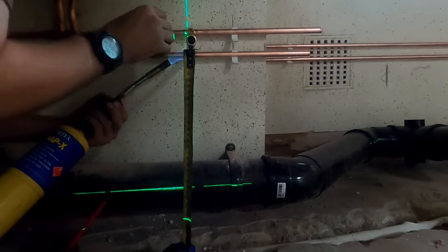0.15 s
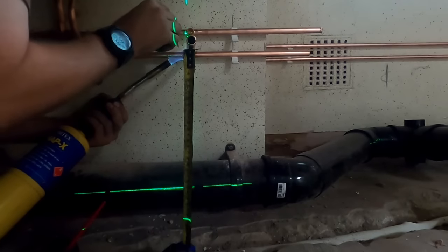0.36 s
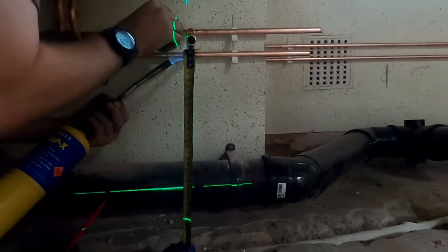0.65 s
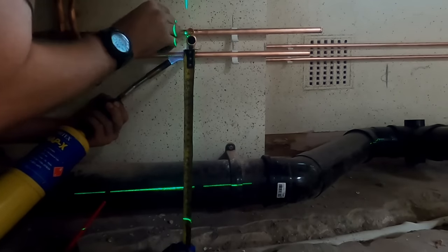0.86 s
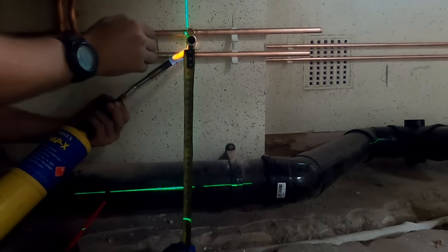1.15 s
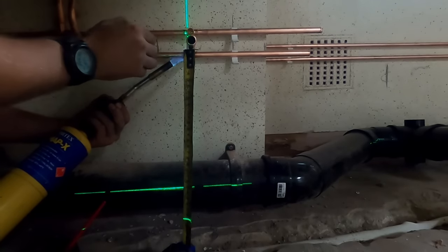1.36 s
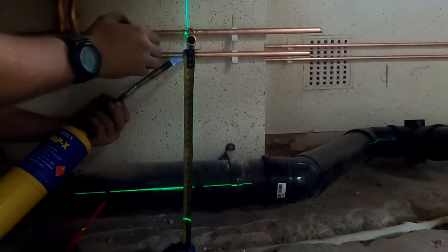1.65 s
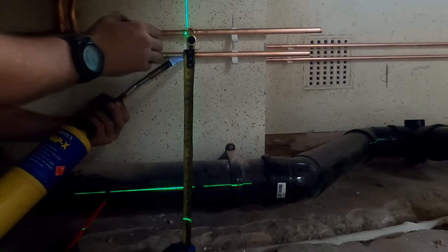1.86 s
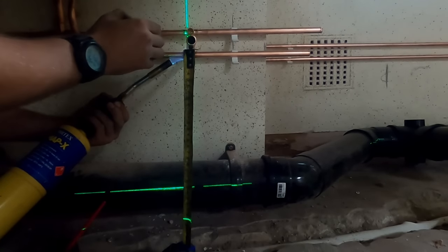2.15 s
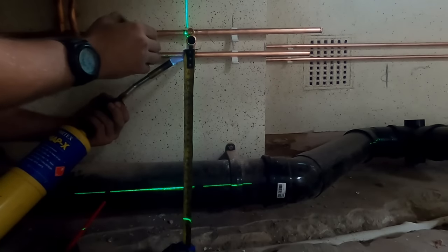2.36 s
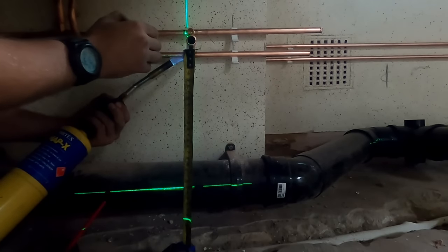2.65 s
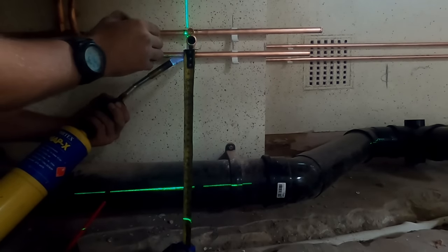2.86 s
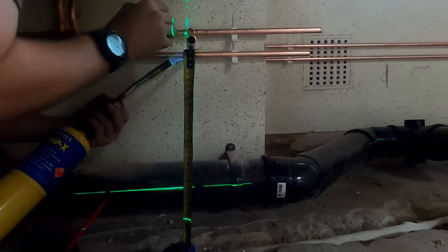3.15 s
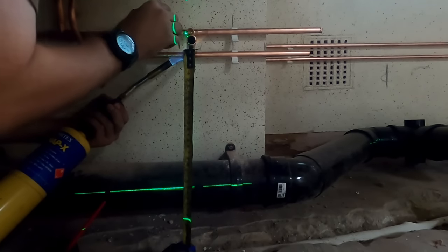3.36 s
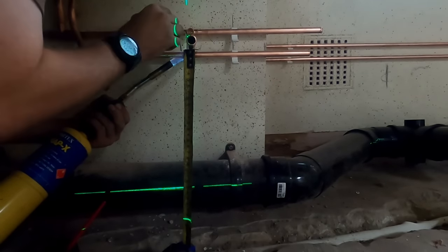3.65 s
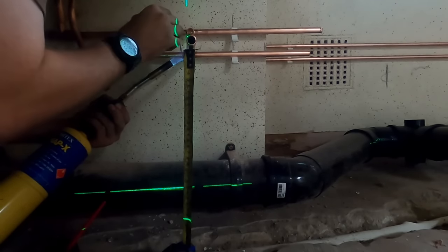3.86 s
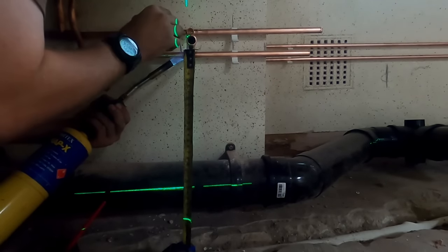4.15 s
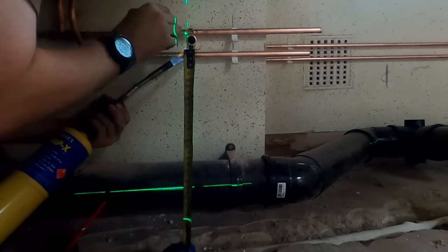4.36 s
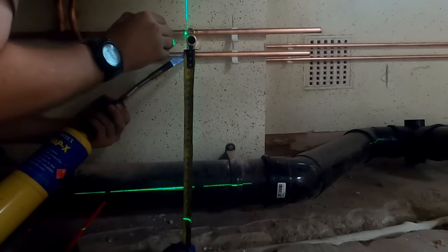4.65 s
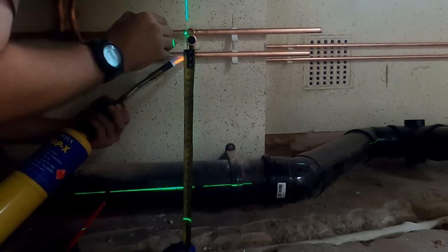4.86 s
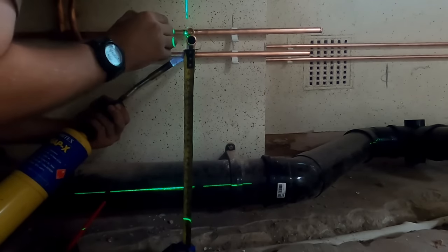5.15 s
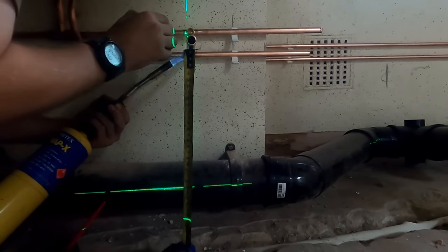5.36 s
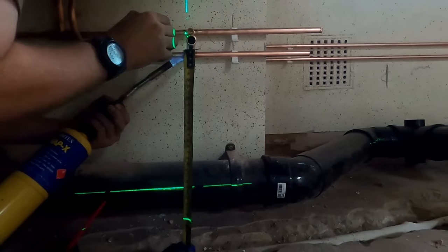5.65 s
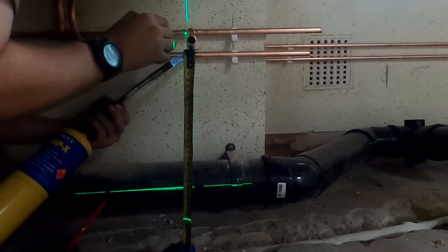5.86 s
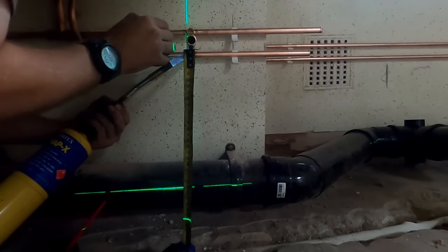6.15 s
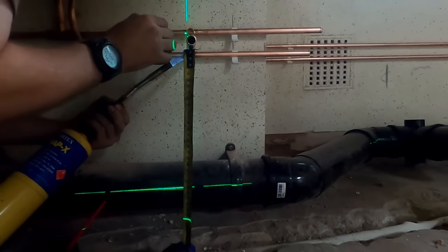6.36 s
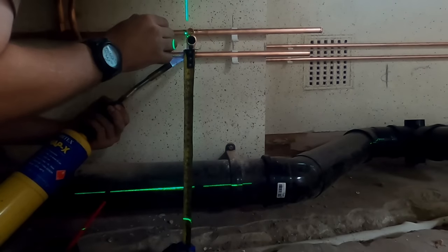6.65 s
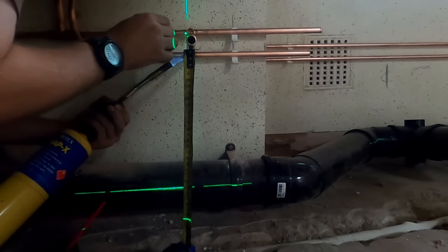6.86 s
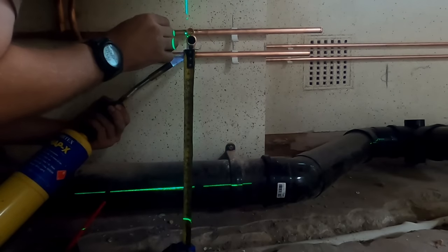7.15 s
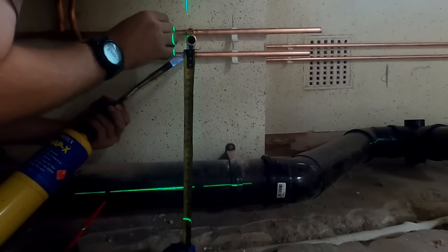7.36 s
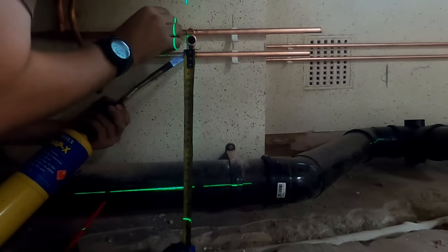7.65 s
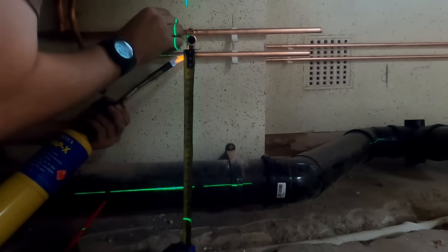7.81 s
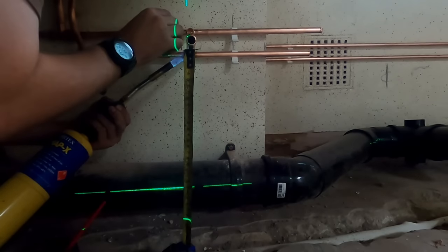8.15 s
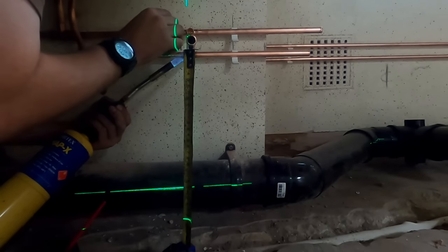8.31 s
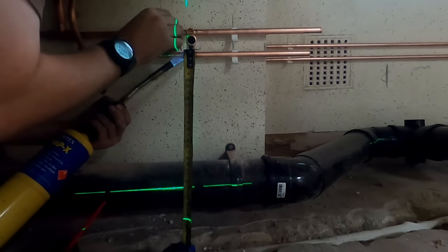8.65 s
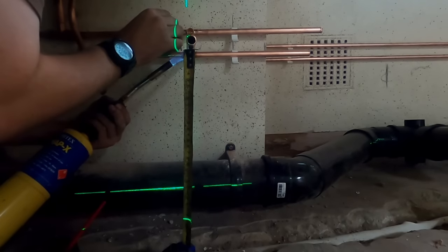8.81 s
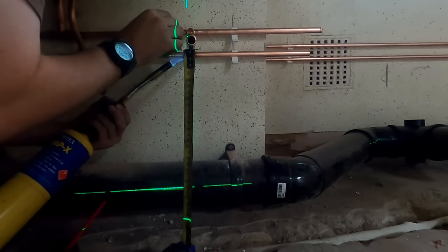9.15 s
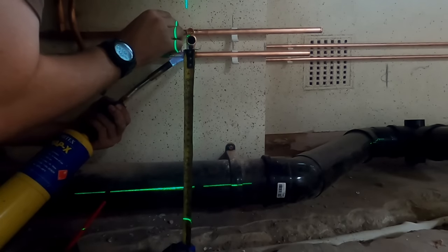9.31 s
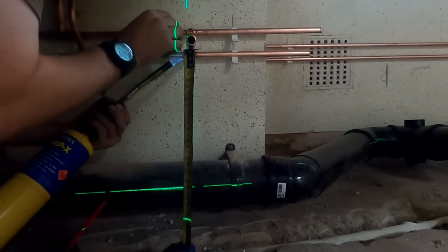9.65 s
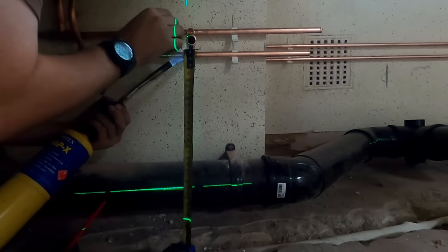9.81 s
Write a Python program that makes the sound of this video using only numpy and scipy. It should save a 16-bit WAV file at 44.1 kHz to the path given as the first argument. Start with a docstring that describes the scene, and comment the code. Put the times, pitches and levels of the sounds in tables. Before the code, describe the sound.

Close stereo sound of a gas blowtorch burning without a break in a small hard-walled room. A low, booming roar sits under a hollow ringing and a bright hiss. The flame flutters raggedly on a copper fitting and sputters in brief puffs. Flux spits sparsely at first, crackles densely in the middle, then thins out while the torch keeps burning.

```python
"""A roaring, hissing gas blowtorch heats a copper fitting in a small room, heard in stereo.
The flame is coloured noise that rumbles, booms and roars in the room's low modes, with dull thumps.
Narrow resonances in noise ring as the burner tube and its mouth; bright noise is the hiss of the jet.
Where the flame strikes the fitting it flutters in ragged noise, and later sputters in short puffs.
The hot flux sizzles and spits in decaying noise bursts, and twice squeaks in a tiny gliding tone."""
import sys
import numpy as np
from scipy import signal
from scipy.fft import rfft, irfft, next_fast_len
from scipy.io import wavfile
from scipy.ndimage import uniform_filter1d, map_coordinates

SR = 44100
rng = np.random.default_rng(int(sys.argv[2]) if len(sys.argv) > 2 else 0)


def to_wav(s):
    """Save 16-bit WAV."""
    ch = np.atleast_2d(s).T  # columns
    pcm = np.round(np.clip(ch, -1, 1) * 32767)  # PCM
    wavfile.write(sys.argv[1], SR, pcm.astype(np.int16))


N = 440118

# How hard the flux boils. Each row: time in seconds, spits per second, typical spit size in dB.
BOIL = [(0, 6, -58), (1.5, 12, -46), (4.1, 27, -50), (4.8, 44, -55), (6.5, 51, -48.5), (7.9, 27, -48),
        (8.5, 33, -65), (9.98, 8.7, -52)]
# A spectrum far below any resonance, so that only the resonances sound: (Hz, dB per Hz).
DARK = [(1000, -90)]
LOW_EVEN_S = 0.43  # the lowest noise holds its strength over this time
WANDER_RATE = 5  # knots per second in the unsteady gas flow


def amp(db):
    """Decibels to gain."""
    return 10 ** (np.asarray(db) / 20)


def unit(x):
    """Scale to rms 1."""
    return x / np.sqrt(np.mean(x ** 2) + 1e-20)


def along(points, hz):
    """Read (Hz, value) points on a log frequency axis."""
    f, v = np.transpose(points)
    return np.interp(np.log(hz + 1), np.log(f + 1), v)


def curves(rows):
    """One value per sample for each column after the time."""
    s, *cols = np.transpose(rows)
    return [np.interp(np.arange(N) / SR, s, c) for c in cols]


def wobble(rate):
    """A smooth random curve of rms 1 with rate knots a second."""
    knots = rng.standard_normal(8192)
    return unit(map_coordinates(knots, [np.arange(N) * rate / SR], mode="wrap"))


def swell(s, length):
    """A smooth rise and fall around time s."""
    return np.exp(-(2 * (np.arange(N) / SR - s) / length) ** 2)


def filtered(x, response):
    """Shape x by a response that is a function of frequency."""
    m = next_fast_len(N + 8192)
    return irfft(rfft(x, m) * response(np.fft.rfftfreq(m, 1 / SR)), m)[..., :N]


def add(track, s, sound):
    """Mix a sound into a track at time s."""
    part = track[round(s * SR):][:len(sound)]
    part += sound[:len(part)]


def rush(spectrum, modes=()):
    """Turbulence of rms 1, coloured by a spectrum and resonances, as the two microphones hear it."""
    # How alike the two microphones are. Each row: frequency in Hz, likeness from 0 to 1.
    alike = [(30, .9), (100, .985), (450, 0.97), (680, 0.7), (1050, 0.98), (1900, 0.59), (2400, 1),
             (3000, 0.78), (4200, 0.93), (4900, 0.99), (6000, 0.45), (7000, 0.87), (8000, 0.36),
             (14000, 0.31)]
    # Stereo balance. Each row: frequency in Hz, left minus right in dB.
    balance = [(120, 0.7), (200, .1), (450, 0), (800, -3), (1050, -3.3), (1400, 0), (2300, 0), (2700, 2),
               (3100, 1.5), (3750, 0.5), (4450, -5.5), (4900, -2.5), (5750, -5), (6400, -9.5), (6900, -2),
               (9000, -5), (13000, -4.8)]
    # Stereo phase. Each row: frequency in Hz, radians by which left leads.
    lead = [(100, -.02), (220, -.1), (420, -.11), (700, -.37), (1100, -.12), (1700, -0.48), (5000, -0.93),
            (6150, -1.27), (6600, -0.58), (7400, -0.96), (9000, -2.04)]
    m = next_fast_len(N + 8192)
    hz = np.fft.rfftfreq(m, 1 / SR)
    power = amp(along(spectrum, hz)) ** 2
    for centre, width, db in modes:
        resonance = amp(db) / (1 + 2 * ((hz - centre) / width) ** 2)
        power = power + resonance ** 2
    # the direct sound is shared; the walls' answer differs from side to side
    shared, apart = rfft(rng.standard_normal((2, m))) * np.sqrt(power)
    turn = np.arccos(np.clip(along(alike, hz), 0, 1)) / 2
    side = np.array([[1], [-1]])  # left, right
    pair = np.cos(turn) * shared + side * np.sin(turn) * apart
    pair = pair * amp(side * along(balance, hz) / 2)
    pair = pair * np.exp(1j * side * along(lead, hz) / 2)
    return unit(irfft(pair, m)[:, :N])


def evened(x, seconds):
    """Noise with its swings slower than the given time taken out."""
    power = uniform_filter1d(np.mean(x ** 2, axis=0), max(int(seconds * SR), 1))
    return unit(x / np.sqrt(np.abs(power) + 1e-9))


def drifting(x, ratio):
    """Shift every resonance of a sound by a moving pitch ratio, reading it faster or slower."""
    position = np.cumsum(ratio)
    return np.array([map_coordinates(channel, [position], mode="mirror") for channel in x])


def burst(t60, attack):
    """The envelope of a pop that dies away between the near walls."""
    t = np.arange(SR // 8) / SR
    return amp(-60 * t / t60) * (1 - np.exp(-t / attack))


def crackle(rate, size_db, t60):
    """The envelope of tiny bubbles bursting at random, rate a second, their powers added."""
    chance, size = rng.random(N), rng.standard_normal(N)
    ticks = (chance < rate / SR) * amp(size_db + 2 * np.clip(size, -1.5, 1.5))
    tick = burst(t60, attack=.0002)
    return np.sqrt(np.abs(signal.fftconvolve(ticks ** 2, tick ** 2)[:N]))


def flame_depths():
    """Unsteady burning drones and rumbles at the bottom and booms in the room's strongest mode."""
    # Levels of the three low layers. Each row: time in seconds, level in dB.
    drone_level = [(0, -65), (1.3, -60), (3.5, -62), (4.2, -64), (4.6, -62), (5.3, -64), (6.4, -61),
                   (6.8, -55), (7.3, -60), (8.1, -63), (8.8, -61), (9.3, -65), (9.98, -63)]
    rumble_level = [(0, -56), (.9, -60), (1.25, -56.5), (1.5, -63), (2.3, -55), (3, -55), (3.75, -56),
                    (4.1, -60), (4.5, -57), (5.7, -56.5), (6.55, -57), (6.8, -49.5), (7.1, -58), (7.7, -59),
                    (8.1, -57), (8.8, -52.5), (9.4, -53), (9.98, -55)]
    boom_level = [(0, -50.5), (.5, -48), (.88, -53), (1.32, -40), (1.48, -51), (1.7, -45), (2.3, -46.5),
                  (2.55, -49), (2.9, -45), (3.1, -51), (3.55, -43.5), (4.55, -48), (4.75, -50),
                  (5.2, -49.5), (5.48, -38.5), (5.68, -46), (5.85, -41), (6.08, -47.5), (6.35, -38.5),
                  (6.55, -52.5), (6.8, -43), (7.1, -49.5), (7.3, -41), (7.5, -42), (7.68, -39.5),
                  (7.95, -50), (8.85, -47.5), (9.4, -44), (9.98, -44.5)]
    # Their smooth spectra. Each row: frequency in Hz, relative dB per Hz.
    drone_spectrum = [(18, -30), (28, -22), (40, -12), (52, -3), (68, -3), (85, -20), (120, -51)]
    rumble_spectrum = [(50, -50), (66, -20), (77, -11), (95, -8), (112, -23), (200, -66)]
    boom_spectrum = [(75, -41), (103, -8), (140, 2.5), (165, -38), (250, -72)]
    # Their resonances. Each row: frequency in Hz, width in Hz, relative dB.
    drone_modes = [(62, 5, 8)]
    rumble_modes = [(90, 21, 0)]
    boom_modes = [(123.1, 14.7, 12)]
    (drone_db,), (rumble_db,), (boom_db,) = curves(drone_level), curves(rumble_level), curves(boom_level)
    uneven_rumble = amp(1.5 * wobble(16)) * rush(rumble_spectrum, rumble_modes)
    rumble = amp(rumble_db) * evened(uneven_rumble, LOW_EVEN_S)
    boom = amp(boom_db) * evened(rush(boom_spectrum, boom_modes), LOW_EVEN_S)
    drone = amp(drone_db + 1.7 * wobble(15)) * evened(rush(drone_spectrum, drone_modes), LOW_EVEN_S)
    return drone + rumble + boom


def roar(eddies):
    """The flame roars in the room's low modes, fills out at the start and now and then surges or sags."""
    # Momentary surges. Each row: time in seconds, length in seconds, change of the roar in dB.
    surges = [(0.02, 0.05, 3.5), (0.32, 0.065, -2), (0.45, 0.055, -3.5), (0.877, 0.05, -2), (1.26, 0.2, 2),
              (1.577, 0.12, 2), (1.707, 0.039, -5), (2.267, 0.08, -4), (2.66, 0.09, -3), (2.78, 0.06, 2.5),
              (3.096, 0.044, -6), (3.418, 0.05, 2.5), (3.88, 0.045, -2.5), (4.126, 0.082, 2.5),
              (4.215, 0.043, -6.5), (4.352, 0.1, 3.5), (4.88, 0.24, -1), (5.408, 0.05, 1),
              (5.77, 0.042, -5), (6.742, 0.044, 5), (7.1, 0.068, -2.5), (7.44, 0.15, -3), (8.32, 0.036, 4),
              (8.46, 0.041, -5), (8.56, 0.06, 2.5), (8.98, 0.24, -1.7), (9.31, 0.035, 2.5), (9.52, 0.2, 1),
              (9.763, 0.08, 2)]
    # The smooth spectrum. Each row: frequency in Hz, relative dB per Hz.
    roar_spectrum = [(110, -39), (150, -6), (200, -5.5), (260, -5.5), (285, -10), (345, -10), (390, -14.5),
                     (470, -21), (590, -23.5), (650, -50), (900, -80)]
    # Modes of the room. Each row: frequency in Hz, width in Hz, relative dB.
    room_modes = [(176.2, 14.2, -0.5), (211.7, 14, -3.5), (268, 10, -8.5), (302.5, 8.4, -0.5),
                  (322.8, 13.3, -2), (428, 19, -13.5), (460.7, 8.9, -15.5)]
    steady_db, softer_db, settle_s, even_s = -42, 1.2, 1, .1
    roar_db = steady_db - softer_db * np.exp(-np.arange(N) / SR / settle_s)
    roar_db = roar_db + sum(db * swell(s, length) for s, length, db in surges)
    shaken = amp(1.07 * eddies + 0.9 * wobble(24)) * rush(roar_spectrum, room_modes)
    return amp(roar_db) * evened(shaken, even_s)


def thumps():
    """A pocket of gas burns at once: a single dull swing of pressure."""
    # Each row: time of the swing's middle in seconds, peak level in dB.
    pockets = [(0.026, -33), (1.289, -30), (1.57, -33), (1.765, -29), (4.017, -27), (4.366, -29),
               (4.435, -33), (4.635, -26.5), (5.341, -30), (5.494, -31), (6.223, -29), (6.34, -31),
               (7.701, -31), (8.547, -29), (8.564, -31), (9.468, -34), (9.493, -28), (9.787, -33)]
    strongest_hz = 206
    out = np.zeros(N)
    t = np.arange(SR // 50) / SR
    u = (np.pi * strongest_hz * (t - t.mean())) ** 2
    for s, db in pockets:
        add(out, s - t.mean(), amp(db) * (2 * u - 1) * np.exp(-u))
    return out


def burner(eddies, flow):
    """The gas keeps the air in the burner tube and at its mouth ringing; the pitch wanders with the flow."""
    # Ring of the tube, then of its mouth. Each row: time in seconds, level in dB.
    tube_ring = [(0, -52.5), (.7, -50.5), (4.2, -51), (5.3, -48.5), (7.6, -50.5), (8.5, -50), (9.98, -49.5)]
    mouth_ring = [(0, -56), (1, -57), (1.45, -61.5), (3, -57.5), (3.7, -55.5), (4.5, -56), (5.8, -59.5),
                  (8.7, -58.5), (9.98, -59.5)]
    # Drift as the torch is held; only its ratio to the mean counts.
    # Each row: time in seconds, pitch of the tube's strongest resonance in Hz.
    tube_pitch = [(0.0, 2400), (1.0, 2414), (1.28, 2385), (6.89, 2408), (9.98, 2383)]
    # Resonances of the tube, then of its mouth. Each row: frequency in Hz, width in Hz, relative dB.
    tube_modes = [(917, 21, -9.5), (1047, 56, -6.5), (1064, 43, -4), (2120, 77, -12.5), (2272, 61, -8.5),
                  (2396, 57, 2), (2485, 246, -6.5), (1215, 185, -11), (3300, 330, -11.5), (3323, 79, -10.5)]
    mouth_modes = [(3520, 117, -2), (3742, 45, -0.5), (3880, 210, -11)]
    tube_wander, mouth_wander, tube_waver = 0.002985, .007, .006  # shares of the pitch (rms)
    waver_rate = 18  # knots per second of the quick waver
    even_s = .13  # the tube's ring holds its strength over this time
    (tube_db,), (mouth_db,), (pitch,) = curves(tube_ring), curves(mouth_ring), curves(tube_pitch)
    steady_tube = evened(rush(DARK, tube_modes), even_s)
    tube_ratio = pitch / pitch.mean() + tube_wander * flow + tube_waver * wobble(waver_rate)
    tube = drifting(steady_tube, tube_ratio)
    mouth = drifting(rush(DARK, mouth_modes), 1 + mouth_wander * flow)
    tube_gain = amp(tube_db + 0.24 * eddies + 0.86 * wobble(12))
    mouth_gain = amp(mouth_db + .5 * eddies + 0.91 * wobble(7))
    return tube_gain * tube + mouth_gain * mouth


def jet(eddies, flow):
    """Gas leaves the nozzle with a bright, finely crinkled hiss and a thin whistle."""
    # Level of the hiss, then of the whistle, which fades as the torch is moved.
    # Each row: time in seconds, level in dB.
    hiss_level = [(0, -48.5), (1.05, -48), (1.75, -50), (2.7, -47), (3.08, -49.5), (3.35, -47.5),
                  (4.9, -47.5), (5.8, -48.5), (8.75, -48.5), (9.07, -51), (9.6, -49), (9.98, -49)]
    whistle_level = [(0, -54), (1, -57), (1.6, -58.5), (2.8, -58.5), (4.5, -73), (9.98, -70)]
    # The hiss's smooth spectrum. Each row: frequency in Hz, relative dB per Hz.
    jet_spectrum = [(1500, -70), (3000, -22.5), (4150, -22.5), (4550, -5), (5300, -5.5), (6250, -8.5),
                    (6700, -12.5), (7300, -18), (8200, -23), (8900, -31.5), (12000, -62), (15000, -80)]
    # Resonances of hiss and whistle. Each row: frequency in Hz, width in Hz, relative dB.
    jet_modes = [(4872, 122, 4), (5400, 110, -15), (5740, 116, 0), (5960, 120, -4.5), (6110, 140, -2.5),
                 (6950, 120, -10.5), (7600, 67, -17)]
    whistle_modes = [(5560, 73, -2), (6540, 250, -11)]
    jet_wander = .005  # share of the pitch (rms)
    crinkle_db, crinkle_rate = 0.85, 420  # fine break-up of the hiss: depth (rms), knots per second
    (hiss_db,), (whistle_db,) = curves(hiss_level), curves(whistle_level)
    hiss = drifting(rush(jet_spectrum, jet_modes), 1 + jet_wander * flow)
    crinkle = unit(amp(0.5 * eddies + 0.3 * wobble(16) + crinkle_db * wobble(crinkle_rate)))
    whistle = amp(whistle_db) * rush(DARK, whistle_modes)
    return amp(hiss_db) * crinkle * hiss + whistle


def flutter(eddies):
    """The flame tears on the fitting in quick, ragged puffs that ring in the corner behind it."""
    # How squarely the flame meets the fitting.
    # Each row: time in seconds, flutter level in dB before a small trim.
    contact = [(0, -49), (.18, -60.5), (.5, -61), (.85, -56), (1.12, -58.5), (1.3, -54.5), (2, -53),
               (3.3, -53), (3.6, -54.5), (4.7, -55.5), (5.4, -53.5), (6.3, -52), (7.9, -54), (9, -57.5),
               (9.35, -56.5), (9.98, -57.5)]
    # The flame presses on the fitting or slips off it.
    # Each row: time in seconds, length in seconds, change of the flutter in dB.
    gusts = [(0.02, 0.054, 1), (0.722, 0.11, 6.5), (1.245, 0.055, 5.5), (2.14, 0.1, 6), (2.316, 0.055, -7),
             (2.79, 0.041, 2.5), (2.843, .05, -4), (3.28, 0.22, 2.5), (3.52, 0.046, -7), (4.397, 0.055, 5),
             (6.153, 0.054, 4), (6.27, 0.059, 4), (6.748, .08, 3.5), (7.127, 0.07, -3.5), (7.7, 0.046, 4),
             (8.143, .05, -11), (9.496, 0.044, 3)]
    # The smooth spectrum. Each row: frequency in Hz, relative dB per Hz.
    flutter_spectrum = [(280, -4), (420, 8), (550, -3), (650, -9), (740, 4.5), (850, 1), (1000, 7),
                        (1300, -7.5), (1420, -4.5), (1900, -3.5), (2500, -5), (4200, -4.5), (6500, -4),
                        (8800, -20.5), (15000, -39)]
    # Resonances of the corner. Each row: frequency in Hz, width in Hz, relative dB.
    corner_modes = [(499, 11.5, 12.2), (548, 10, 4.9), (582, 13, 8.7), (1013, 38, 8.8), (1195, 90, 3.2),
                    (1305, 41, 9.7), (1496, 62, 0.54), (1682, 43, 1)]
    # slow sway and quick rags: depth in dB before limiting, knots per second
    sway_db, sway_rate, rag_db, rag_rate = 2.5, 18, 2.5, 260
    contact_db, = curves(contact)
    gust_db = sum(db * swell(s, length) for s, length, db in gusts)
    tearing_db = 3 * eddies + sway_db * wobble(sway_rate) + rag_db * wobble(rag_rate)
    tearing = unit(amp(10 * np.tanh(tearing_db / 10)))  # puffs have a largest size
    strength = amp(contact_db + gust_db - 0.38) * tearing
    return strength * rush(flutter_spectrum, corner_modes)


def sizzle(eddies):
    """A fine, grainy sizzle of tiny bubbles lies on top and grows as the flux boils harder."""
    # The smooth spectrum. Each row: frequency in Hz, relative dB per Hz.
    sizzle_spectrum = [(6000, -17), (8900, -2), (9500, -0.5), (10100, 0.5), (10800, 3), (12600, 2.5),
                       (13300, -4), (14300, -13), (15200, -30)]
    bed_db, db_per_doubling, reference_rate = -70.7, .9, 20  # bed level at the reference spits per second
    tick_db, ticks_per_spit, tick_t60_s = 5, 1.5, .014  # bubbles: typical size over the bed, number, decay
    rate, _ = curves(BOIL)
    boil_db = bed_db + db_per_doubling * np.log2(np.maximum(rate, 1) / reference_rate)
    grain = np.hypot(1, crackle(ticks_per_spit * rate, tick_db, tick_t60_s))
    return amp(boil_db + 0.45 * eddies + 0.85 * wobble(18)) * grain * rush(sizzle_spectrum)


def flux():
    """Boiling flux spits: many tiny ticks and some sharp ones with a top fizz."""
    # The loudest spits. Each row: time in seconds, level in dB (the crack is trimmed below it),
    # level of the top fizz in dB relative to that.
    loud_spits = [(0.652, -38, -36), (0.9934, -34, -38), (1.098, -38, -36), (1.245, -38, -30),
                  (1.949, -32, -33), (2.0133, -46, -34), (2.635, -35, -38), (2.778, -35, -30),
                  (3.314, -41, -34), (3.657, -38, -27), (3.767, -35, -25), (3.912, -37, -32),
                  (4.027, -36.5, -34), (4.11, -37, -34), (4.212, -41, -29), (4.315, -37.5, -36),
                  (4.4, -34.5, -34), (4.578, -41, -20), (4.692, -37, -33), (4.722, -35, -26),
                  (4.791, -33, -33), (4.872, -36, -28), (4.971, -46, -20), (4.983, -37.5, -29),
                  (5.132, -39, -25), (5.238, -33, -28), (5.242, -35, -30), (5.343, -42, -18),
                  (5.383, -35, -18), (5.388, -35, -26), (5.408, -37, -33), (5.644, -39, -26),
                  (5.782, -38, -23), (5.893, -37, -20), (6.0511, -38, -21), (6.168, -37, -27),
                  (6.2048, -38, -18), (6.257, -36, -30), (6.454, -33, -25), (6.49, -40, -21),
                  (6.5869, -42, -21), (6.607, -39, -33), (6.677, -38, -21), (6.687, -37, -24),
                  (6.769, -39, -31), (6.8209, -41, -21), (6.888, -35.5, -27), (6.919, -41, -21),
                  (7.014, -40, -20), (7.201, -34.5, -24), (7.2599, -39, -22), (7.3612, -38, -34),
                  (7.89, -44, -19), (7.967, -35, -28), (8.025, -43, -18), (8.069, -29.5, -26),
                  (8.0715, -37, -26), (8.316, -36, -22), (8.8598, -39, -34), (9.368, -38, -38)]
    # The crack's smooth spectrum. Each row: frequency in Hz, relative dB per Hz.
    spit_spectrum = [(600, -17), (1600, -9), (2400, 5), (4200, 3.5), (4900, 12.5), (5500, -2.5), (6500, 9),
                     (7800, -8), (9000, -21.5), (12500, -26), (15500, -32)]
    fizz_spectrum = [(6000, -30), (8500, 4.5), (12800, 0), (15300, -13)]  # the same for the fizz
    snap_db, snap_t60_s = -4.5, 0.0063  # the direct snap of a spit, over its echo between the walls
    rate, size_db = curves(BOIL)
    crack = crackle(rate, size_db, t60=0.021)
    fizz = np.zeros(N)
    echo = burst(t60=0.027, attack=0.00024)
    spit = echo + amp(snap_db) * burst(t60=snap_t60_s, attack=.0001)
    for s, db, fizz_db in loud_spits:
        add(crack, s, amp(db - 5.5) * spit)
        add(fizz, s, amp(db + fizz_db) * spit)
    return crack * rush(spit_spectrum) + fizz * rush(fizz_spectrum)


def puffs():
    """The flame catches on an edge and sputters, which rings the burner tube."""
    # Each row: time in seconds, level in dB.
    catches = [(1.234, -40), (1.370, -43), (1.649, -40), (1.733, -45), (1.949, -36), (2.012, -40),
               (2.164, -43), (4.664, -45), (4.959, -45), (5.240, -41), (5.383, -40), (5.683, -43),
               (6.153, -40), (6.247, -46), (6.265, -40), (6.477, -40), (7.706, -43), (9.37, -40.5)]
    # The smooth spectrum. Each row: frequency in Hz, relative dB per Hz.
    puff_spectrum = [(350, -30), (520, -4), (650, -14), (850, -2), (1300, -6), (1600, -9), (2100, -12),
                     (3300, -15), (5000, -18), (8000, -40)]
    # Resonances. Each row: frequency in Hz, width in Hz, relative dB.
    puff_modes = [(1040, 130, 9.8), (2300, 180, 1)]
    t60_s, attack_s, even_s = 0.04, 0.0015, 0.0049
    strength = np.zeros(N)
    for s, db in catches:
        add(strength, s, amp(db) * burst(t60_s, attack_s))
    return strength * evened(rush(puff_spectrum, puff_modes), even_s)


def squeaks():
    """Vapour squeezes out of the joint in tiny gliding chirps, a few milliseconds each."""
    # Each row: time of the peak in seconds, pitch at the peak in Hz, peak level in dB,
    # rise time in seconds, glide in Hz per second.
    chirps = [(5.0948, 2400, -38.5, .0013, -240000), (5.2768, 3150, -37.5, 0.002, 30000)]
    out = np.zeros(N)
    t = np.arange(SR // 20) / SR
    for s, hz, db, rise, glide in chirps:
        phase = 2 * np.pi * np.cumsum(hz + glide * (t - rise)) / SR
        phase = phase + np.cumsum(.05 * rng.standard_normal(len(t)))  # the tone is slightly rough
        envelope = (t / rise) ** 2 * np.exp(2 - 2 * t / rise)
        add(out, s - rise, amp(db) * envelope * np.sin(phase))
    return out


def walls(hz):
    """Echoes of the walls, a short decaying noise tail, cut fine ripples into the treble."""
    t = np.arange(SR // 5) / SR
    tail = rng.standard_normal((2, len(t))) * amp(-60 * t / .2) * (t > .008)
    answer = rfft(tail / np.linalg.norm(tail[0]), 2 * (len(hz) - 1))
    wet = .16 * np.clip(hz / 3000, 0, 1) ** 2  # full from 3 kHz up
    return 1 + wet * answer


def scene():
    """The same eddies shake the roar, ring, hiss, flutter and sizzle; the walls answer everything."""
    eddies, flow = wobble(85), wobble(WANDER_RATE)
    flame = flame_depths() + roar(eddies) + thumps()
    torch = flame + burner(eddies, flow) + jet(eddies, flow)
    joint = flutter(eddies) + sizzle(eddies) + flux() + puffs() + squeaks()
    return filtered(torch + joint, walls)


def record(dry):
    """Nothing is kept above a sharp band limit in the top treble."""
    top_hz = 15400
    return filtered(dry, lambda hz: hz < top_hz)


dry = scene()
out = record(dry)
to_wav(out)
```